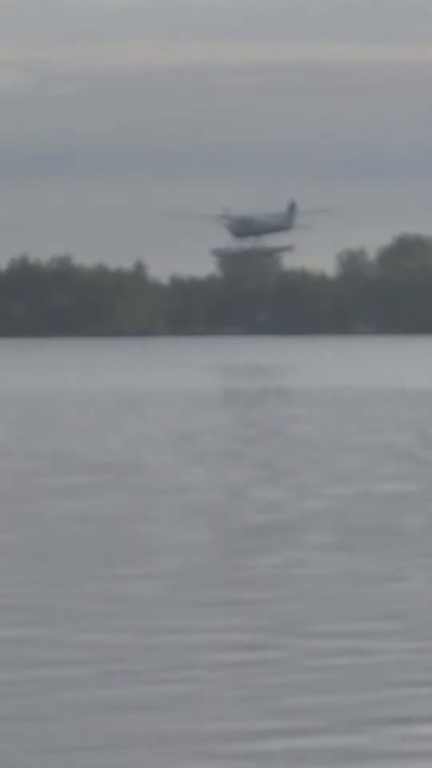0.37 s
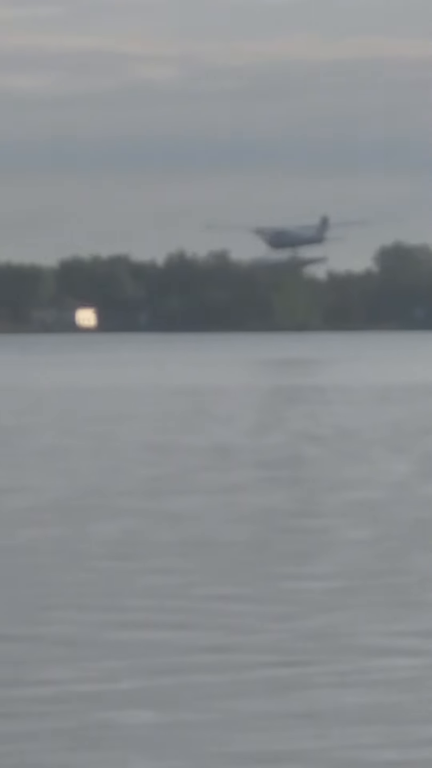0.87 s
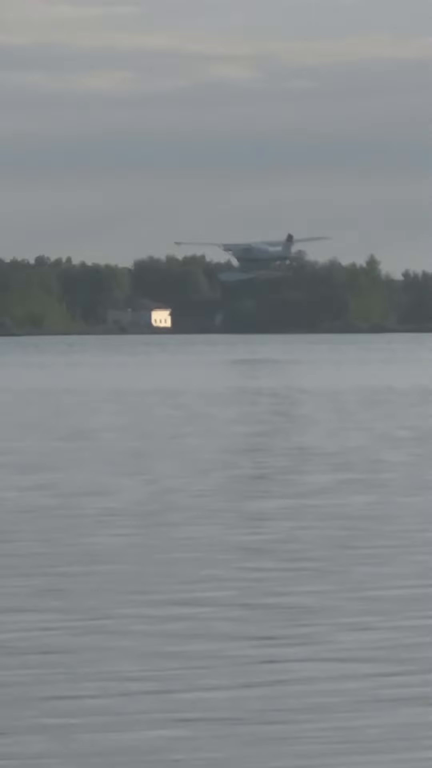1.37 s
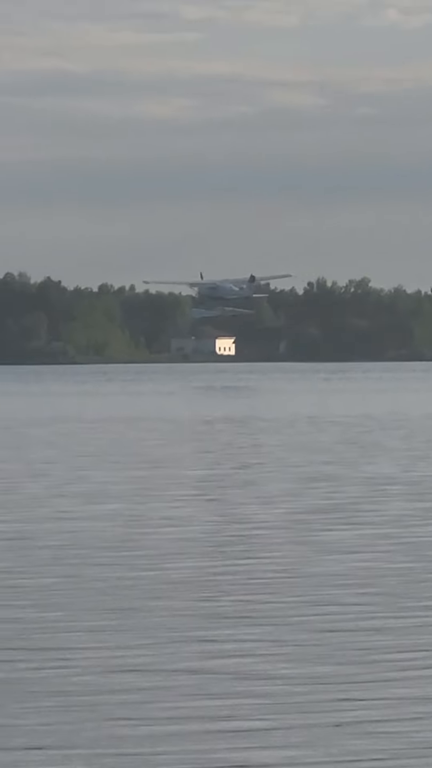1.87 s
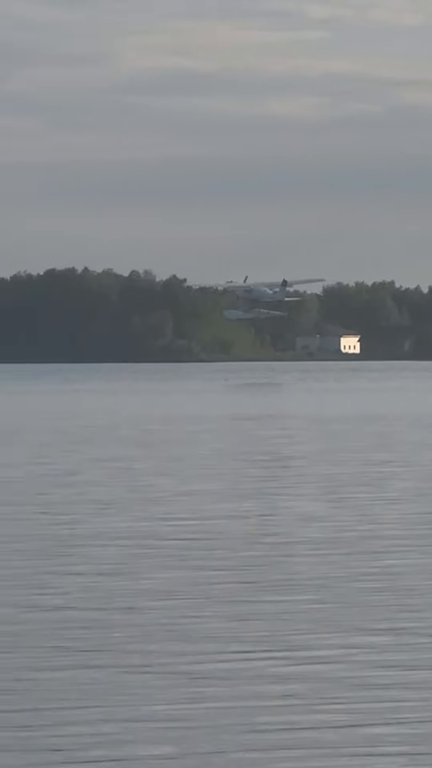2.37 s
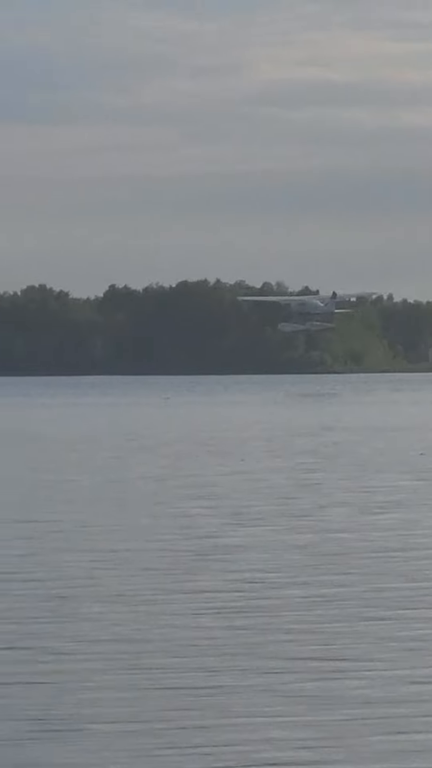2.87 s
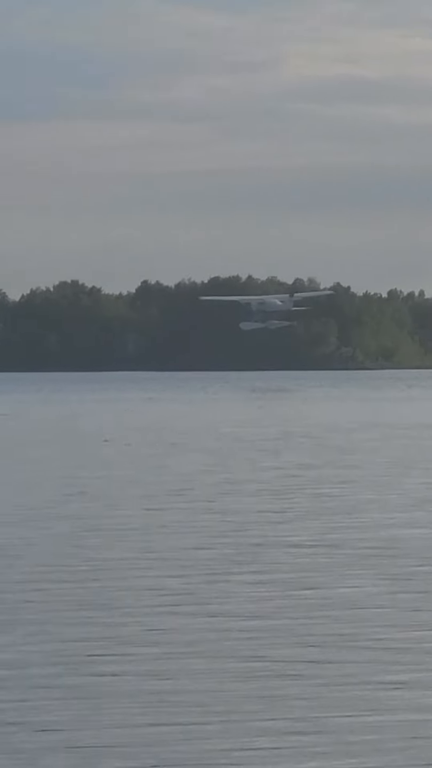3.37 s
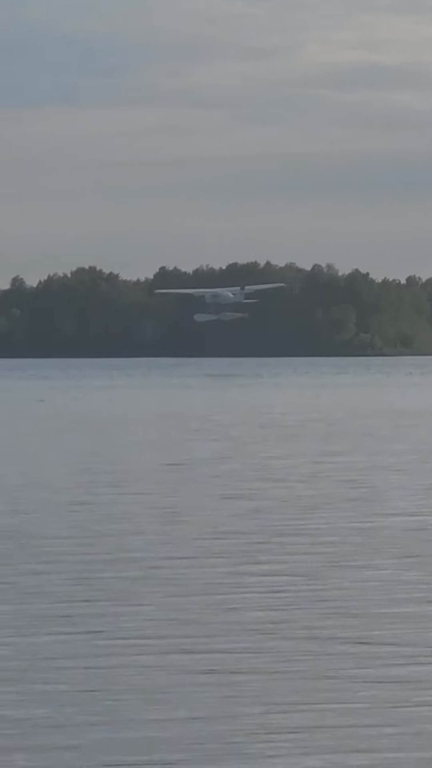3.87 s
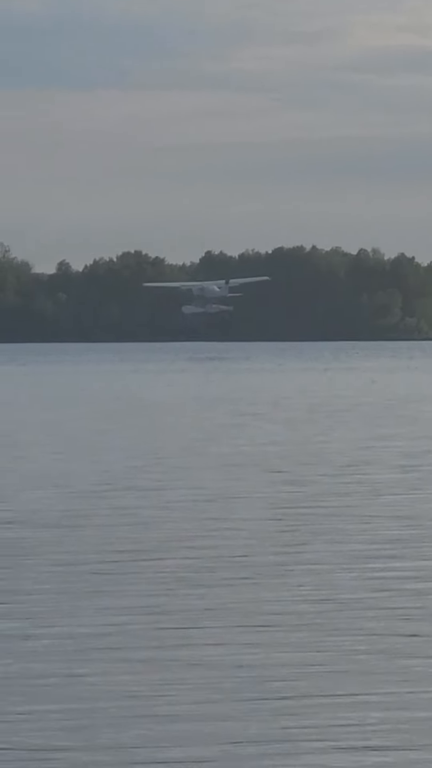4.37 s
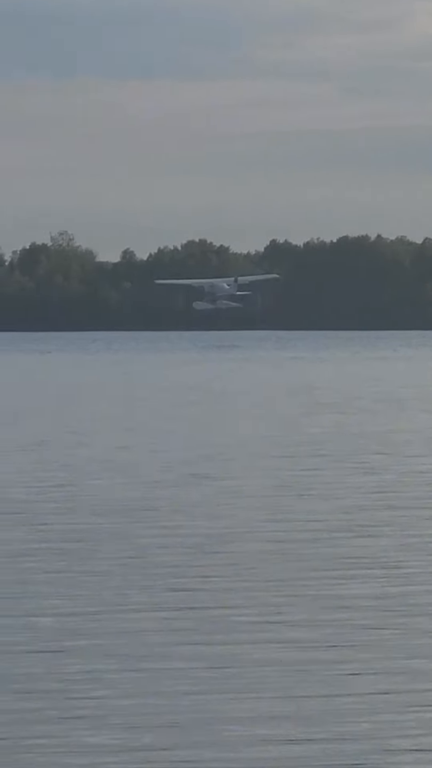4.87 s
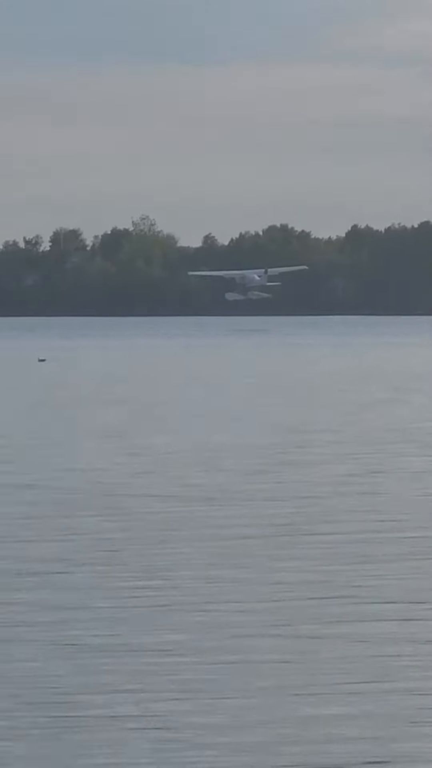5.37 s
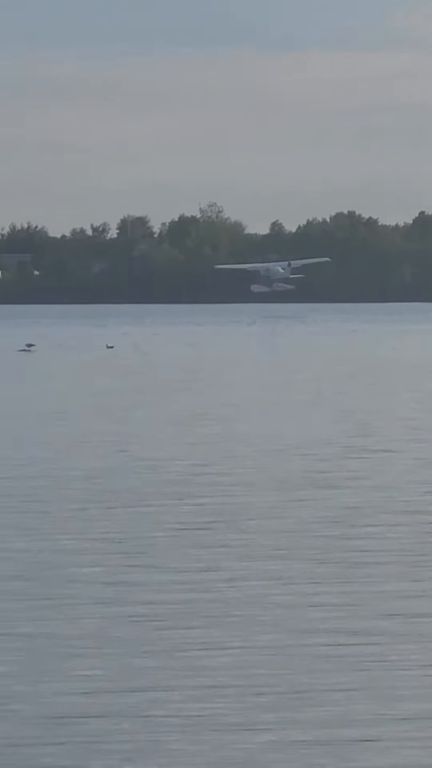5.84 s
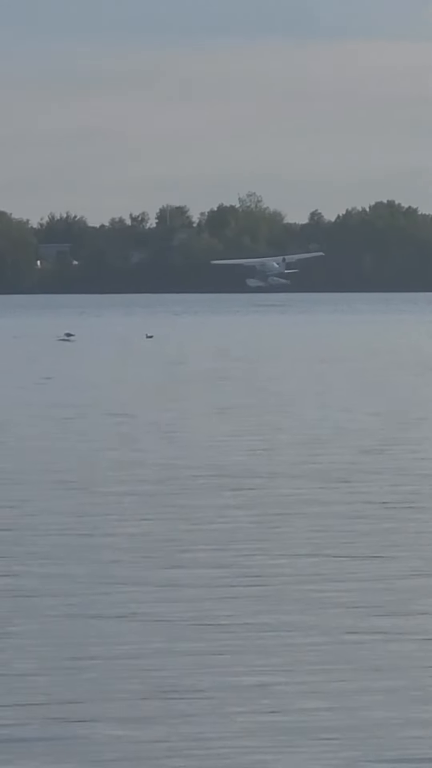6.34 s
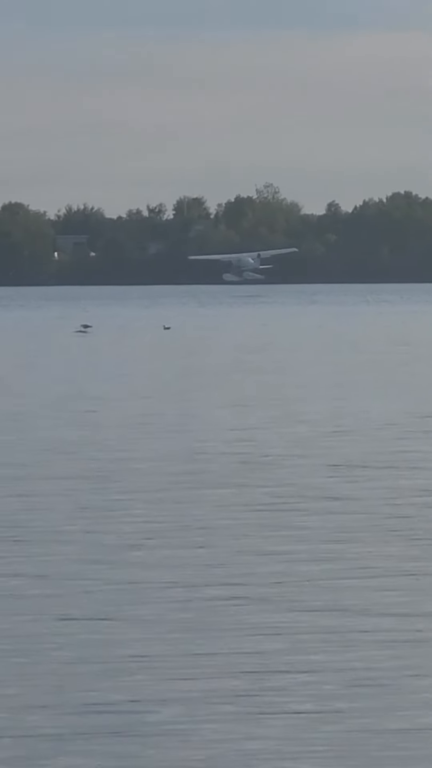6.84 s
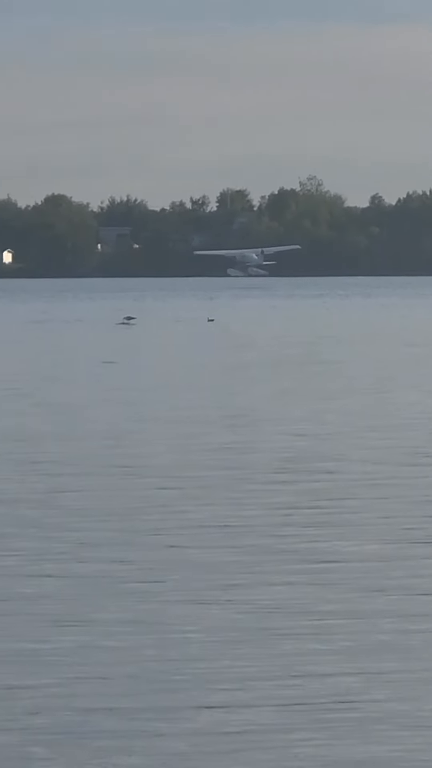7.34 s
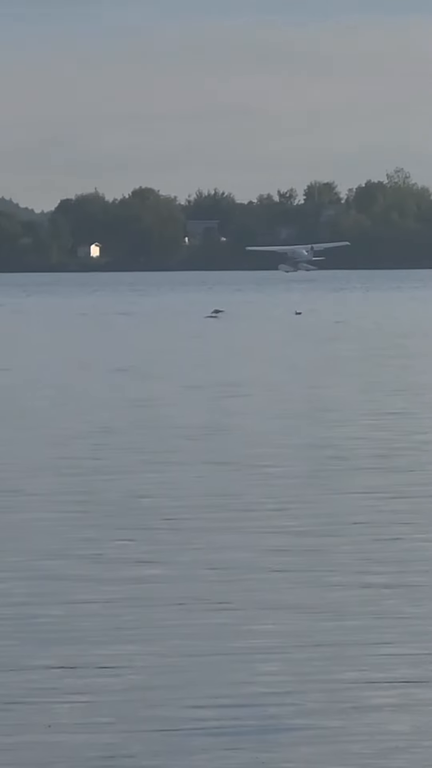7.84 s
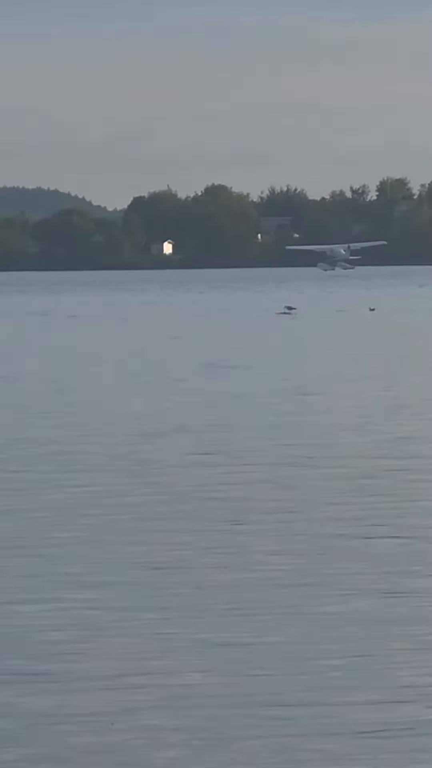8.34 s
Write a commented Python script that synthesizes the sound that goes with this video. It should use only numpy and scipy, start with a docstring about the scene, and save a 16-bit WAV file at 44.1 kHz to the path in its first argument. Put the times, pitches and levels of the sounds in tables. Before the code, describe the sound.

Outdoors by a lake, a small propeller plane glides away at low throttle with soft flutters of blade noise, swells with power around two to three seconds, eases back near four, then revs again and holds a higher, more distant drone. A steadier low motor hum lies beneath. Songbirds warble throughout with woodland echoes; one buzzes at three seconds. Handheld stereo pickup with a few tiny ticks.

```python
"""A small floatplane glides down over a lake, its pilot twice adding power: tones locked to one shaft, exhaust
and airframe noise and puffs of blade slap, all following throttle and distance. A steady motor hums farther
off, a drone and its octave in a fading rumble. On the shore songbirds warble in gliding tones, a blackbird
buzzes in pulses that ring its throat, a bird chips and a larger one whistles, all with echoes. Shore noise lies
beneath; small clicks sound right at the microphone."""
import sys
import numpy as np
from scipy import signal
from scipy.fft import rfft, irfft
from scipy.io import wavfile
from scipy.ndimage import uniform_filter1d

SR = 44100
rng = np.random.default_rng(int(sys.argv[2]) if len(sys.argv) > 2 else 0)


def pcm_store(signal):
    """Save signal as 16-bit PCM."""
    levels = np.round(np.clip(np.atleast_2d(signal), -1, 1) * 32767)
    wavfile.write(sys.argv[1], SR, levels.astype(np.int16).T)


def amplitude_ratio(level_db):
    """Convert a level in decibels to the matching linear amplitude (field) ratio."""
    exponent = np.asarray(level_db, float) / 20
    return 10 ** exponent


N = 384552
T = np.arange(N) / SR
# Samples by which sound reaches the left port after the right one; negative: the left port leads.
LAKE_LAG, SHORE_LAG = -7, -2


def level(x, db):
    """Scale to an rms level."""
    return x * amplitude_ratio(db) / np.sqrt(np.mean(x ** 2))


def curves(rows):
    """Columns of a table as sample-rate curves."""
    s, *columns = np.transpose(rows)
    return [np.interp(T, s, c) for c in columns]


def walk(rate):
    """Random levels held 1 / rate s and slewed twice; spread near 1."""
    hold = int(SR / rate)
    steps = np.repeat(rng.standard_normal(N // hold + 1), hold)
    return 1.3 * uniform_filter1d(uniform_filter1d(steps, hold), hold)[:N]


def ports(x, pan_db, lag):
    """One direction: a level step and a lag in samples between the two microphone ports."""
    return np.array([np.roll(x, lag) * amplitude_ratio(pan_db / 2), x * amplitude_ratio(-pan_db / 2)])


def bin_hz():
    """Pitches of the spectrum bins, kept above zero for the logarithm."""
    return np.maximum(np.arange(N // 2 + 1) * SR / N, 1)


def across(rows):
    """A table's second column over the spectrum, straight lines on log pitch."""
    hz, value = np.transpose(rows)
    return np.interp(np.log(bin_hz()), np.log(hz), value)


# How alike wide noise is at the two ports. Each row: pitch in Hz, likeness from 0 to 1.
LIKENESS = [(30, 0.78), (120, 1), (290, 0.95), (640, 0.98), (1400, 0.7), (3000, 0.1), (8000, 0)]


def noise(colour, humps=()):
    """Stereo noise of a colour with resonances; alike in the bass, unrelated in the treble."""
    hz = bin_hz()
    db = across(colour) + sum(g / (1 + (2 * (hz - f) / w) ** 2) for f, w, g in humps)
    like = np.clip(across(LIKENESS), 0, 1)
    same, left, right = rfft(rng.standard_normal((3, N)))
    late = np.exp(-2j * np.pi * hz * LAKE_LAG / SR)
    shared = np.sqrt(like) * same * np.array([late, np.ones_like(late)])
    apart = np.sqrt(1 - like) * np.array([left, right])
    return level(irfft((shared + apart) * amplitude_ratio(db), N), 0)


def band(x, hz, width):
    """Steep band-pass."""
    edges = [hz - width / 2, hz + width / 2]
    return signal.sosfilt(signal.butter(2, edges, "bandpass", fs=SR, output="sos"), x)


def sing(notes, overtones_db, flutter_db, wobble):
    """Near-sine glides with rounded corners, soft edges, a fluttering level and a wobbling pitch."""
    out, flutter, bend = np.zeros(N), amplitude_ratio(flutter_db * walk(120)), 1 + wobble * walk(150)
    for note in notes:
        s, hz, db = np.transpose(note)
        i = np.arange(int(s[0] * SR), min(int(s[-1] * SR), N))
        corner = min(len(i) // 5 + 1, 500)  # samples
        hz, db = (uniform_filter1d(np.interp(i / SR, s, c), corner) for c in (hz, db))
        phase = 2 * np.pi * np.cumsum(hz * bend[i]) / SR
        edge = np.clip(np.minimum(i - i[0], i[-1] - i) / (.003 * SR), 0, 1)
        tone = np.sin(phase)
        for k, overtone_db in enumerate(overtones_db):
            tone = tone + amplitude_ratio(overtone_db) * np.sin((k + 2) * phase)
        out[i] += np.sqrt(2) * amplitude_ratio(db) * edge * flutter[i] * tone
    return out


def trees(x, t60, wet_db):
    """Scattered echoes off trunks and water, other ones at each port; leaves and air dull them."""
    t = T[:SR]
    tail = rng.standard_normal((2, len(t))) * 1000 ** (-t / t60) * np.clip(t / .008, 0, 1)
    tail /= np.sqrt(np.sum(tail ** 2, axis=1, keepdims=True))
    tail = signal.sosfilt(signal.butter(2, 5200, fs=SR, output="sos"), tail)
    return amplitude_ratio(wet_db) * signal.fftconvolve(x[None], tail, axes=1)[:, :N]


# Colour of the noise along the shore. Each row: pitch in Hz, relative density in dB per Hz.
SHORE = [(1300, -15.5), (2200, -1.5), (3600, -4), (5200, -5), (6900, -7.5), (7800, -11), (8300, -32.5),
         (8800, -38), (9800, -36), (10400, -37), (14500, -23.5), (15700, -39), (16100, -82)]


def shore_noise():
    """A steady, faint wide noise around the microphone."""
    return amplitude_ratio(-65) * noise(SHORE)


# Hum of the distant motor. Each row: time in seconds, pitch in Hz, mean level in dB.
HUM = [(0, 117.9, -54), (.5, 117.6, -44), (1.2, 117, -38.5), (1.8, 115, -45), (2.4, 113.6, -40),
       (2.9, 109.5, -40), (3.55, 109.5, -39.5), (4.1, 114, -42), (5.2, 116.3, -37.5), (5.8, 119.2, -41),
       (6.5, 115.1, -41), (7.5, 112.5, -42.5), (8.72, 114.4, -42.5)]
# Colour of the low rumble. Each row: pitch in Hz, relative density in dB per Hz.
RUMBLE = [(15, -50), (28, -22), (45, -5), (65, 0), (95, -3), (140, -7), (200, -10), (300, -20), (600, -60)]


def motor():
    """A steady drone with a weak octave, and the fading rumble around it."""
    octave_db, rumble_db, fade_db_per_s = -19, -42, 0.45
    hz, db = curves(HUM)
    phase = 2 * np.pi * np.cumsum(hz) / SR + .3 * walk(6.6)
    octave = amplitude_ratio(octave_db + 2.5 * walk(5)) * np.sin(2 * phase)
    tone = amplitude_ratio(db + 1.34 * walk(8)) * (np.sin(phase) + octave)
    rumble = amplitude_ratio(rumble_db - fade_db_per_s * T) * noise(RUMBLE)
    return ports(np.sqrt(2) * tone, 0.08, LAKE_LAG) + rumble


# Tiny clicks right at the microphone. # Each row: time in seconds, relative level in dB, ring in Hz, left minus
# right in dB.
TICKS = [(.670, -44, 6900, -11), (5.5358, -34, 14300, 1.5), (5.570, -50, 13600, 5.5),
         (5.5776, -34, 5560, -10.5), (5.577, -42.5, 13840, -2), (5.6035, -40, 4740, -5.5),
         (5.748, -59, 8850, -2), (7.824, -43, 7050, -9.5)]


def ticks():
    """Tiny clicks that ring for a millisecond."""
    out, t = np.zeros((2, N)), T[:300]
    for s, db, hz, pan_db in TICKS:
        ring = np.sin(2 * np.pi * hz * t) * np.e * t / 0.00026 * np.exp(-t / 0.00019)
        click = ring + .1 * rng.standard_normal(len(t)) * np.exp(-t / .0002)
        i = int(s * SR)
        out[:, i:i + len(t)] += amplitude_ratio(db + np.array([[pan_db], [-pan_db]]) / 2) * click
    return out


# Low whistles on the shore, a list of notes.
# Each row of a note: time in seconds, pitch in Hz, direct level in dB before the flutter.
WHISTLE = [
    [(2.45, 1177, -65), (2.468, 1195, -58), (2.518, 1201, -53), (2.58, 1172, -50), (2.598, 1155, -63),
     (2.61, 1305, -63)],
    [(8.34, 831.5, -62), (8.356, 752, -62), (8.43, 1580, -51.5), (8.456, 1686, -40.5), (8.476, 1370, -59),
     (8.5, 1350, -55)],
    [(8.555, 1188, -64.5), (8.575, 1274, -45.5), (8.595, 1390, -47), (8.621, 1413, -42), (8.669, 1353, -53),
     (8.72, 1400, -47.5)],
]


def large_bird():
    """Low gliding whistles, nearly pure; the last note carries two faint overtones."""
    return sing(WHISTLE[:2], [], 0.6, 0.0022) + sing(WHISTLE[2:], [-26, -28], .8, .002)


# Chip of a near bird. Each row: time in seconds, pitch in Hz, relative level in dB.
CHIP = [(3.934, 8230, -56), (3.939, 7270, -44), (3.946, 6800, -40.5), (3.951, 5700, -58),
        (3.962, 3300, -64)]


def near_chip():
    """One very short tone that plunges in pitch."""
    return sing([CHIP], [], 1.1, 0.0093)


# Songbird slides along the shore.
# Each row: start in seconds, length in seconds, first pitch in Hz, last pitch in Hz, relative level in dB.
SLIDES = [ (.245, 0.041, 3270, 2580, -57), (.39, 0.055, 4880, 3780, -55.5), (.5, 0.024, 4400, 5460, -50),
          (.64, 0.037, 2610, 3620, -56), (1.19, .035, 2800, 3540, -55), (1.61, 0.052, 2750, 4830, -54),
          (1.66, 0.024, 3400, 2620, -68), (2.005, 0.032, 4400, 3020, -57), (2.05, .055, 3150, 4900, -52.5),
          (2.185, 0.046, 4850, 3200, -51), (2.375, 0.046, 2600, 4300, -53), (2.47, .04, 3900, 2700, -59),
          (3.085, 0.027, 5700, 5760, -56), (3.11, .05, 4700, 3450, -58), (3.19, .03, 3150, 3450, -50),
          (3.33, 0.02, 3150, 3420, -50), (3.42, 0.028, 2980, 3470, -49.5), (3.5, .02, 2990, 3400, -52),
          (3.67, .04, 2990, 3560, -63), (2.1, .035, 4750, 4900, -57.5), (2.3, .03, 3600, 3620, -61),
          (3.8, 0.086, 2840, 2900, -59.5), (4.165, 0.032, 4090, 5040, -54),
          (4.198, .042, 4100, 2520, -54.5), (4.23, 0.051, 4250, 4750, -55), (4.25, 0.017, 2950, 2960, -56),
          (4.94, 0.027, 5100, 5750, -55), (4.95, 0.038, 4750, 4700, -60.5), (4.98, .02, 4700, 5300, -54),
          (5.01, 0.029, 4500, 5260, -52.5), (5.035, 0.036, 3900, 4930, -54), (5.15, .06, 3900, 3060, -59.5),
          (5.34, .05, 4270, 2735, -56.5), (5.46, .02, 3690, 2830, -56), (5.5, 0.053, 2600, 4700, -54),
          (5.56, 0.063, 4500, 2580, -53.5), (5.96, 0.036, 3200, 3000, -64.5), (6.0, 0.035, 3030, 4160, -58),
          (6.03, .045, 4090, 4310, -57.5), (6.05, 0.025, 4100, 5150, -59), (5.07, .04, 2600, 2730, -63),
          (5.18, 0.059, 2450, 2350, -60), (6.07, 0.12, 4200, 2480, -53), (6.21, .035, 2750, 3750, -53.5),
          (6.205, 0.09, 2680, 2860, -63), (6.665, .03, 4200, 5260, -55), (6.7, .055, 4900, 3780, -50),
          (6.76, 0.037, 5150, 4540, -54), (6.82, 0.1, 2450, 2910, -60), (6.845, 0.049, 3700, 2640, -53),
          (6.91, .1, 3000, 2900, -58), (6.965, 0.026, 2980, 3680, -53), (7.07, .055, 2940, 2300, -62.5),
          (7.143, .02, 2900, 3700, -53), (7.175, 0.032, 4950, 2530, -58), (7.2, 0.082, 2300, 2600, -57.5),
          (7.85, .03, 3890, 2930, -65), (7.88, .02, 2930, 4300, -51.5), (7.955, .065, 3650, 2410, -58.5),
          (8.04, .03, 2520, 3010, -54), (8.095, .025, 3200, 3500, -55), (8.118, .012, 3500, 4100, -59),
          (7.95, .025, 3200, 2600, -58), (8.405, 0.014, 3300, 2700, -51)]
# Songbird arches, up and down again or the reverse.
# Each row: start in seconds, length in seconds, end pitch in Hz, turning pitch in Hz, relative level in dB.
ARCHES = [ (.085, 0.07, 2960, 4520, -50), (.3, 0.039, 3020, 3360, -53.5), (.69, 0.05, 2470, 2850, -59),
          (1.495, .075, 2680, 3510, -58), (2.31, 0.052, 2630, 3500, -51.5), (2.512, 0.058, 2590, 3710, -57),
          (4.335, .078, 2650, 3760, -52.5), (4.435, .055, 2870, 3310, -57), (4.515, 0.054, 3300, 4210, -55),
          (5.065, 0.056, 3420, 4440, -52.5), (5.24, 0.093, 2300, 3630, -53),
          (5.7, 0.075, 2204, 3250, -57.5), (6.92, 0.072, 5780, 3816, -55.5),
          (7.92, 0.058, 3060, 3660, -54.5)]
# Songbird loudness by pitch. Each row: pitch in Hz, gain in dB.
THROAT = [(2200, -4.5), (2900, -0.2), (3800, -2.5), (4800, -7), (5800, -5.5)]


def warble():
    """Slides and arches as notes: each swells in its middle and is louder where the throat favours it."""
    swell_db = 1.5  # note ends under its middle
    u = np.linspace(0, 1, num=9)
    fall = 1 - (1 - u) ** 1.35  # falling slides drop fast, then level off
    arch = np.sin(np.pi * u) ** 1.6
    notes = []

    def add(s, length, hz, db):
        note_db = db + np.interp(hz, *np.transpose(THROAT)) - swell_db * (2 * u - 1) ** 2
        notes.append(np.c_[s + length * u, hz, note_db])

    for s, length, first, last, db in SLIDES:
        add(s, length, first + (last - first) * (u if last > first else fall), db)
    for s, length, end, turning, db in ARCHES:
        add(s, length, end + (turning - end) * arch, db)
    return sing(notes, [], 3.24, .014)


# The blackbird's clear opening notes, a list of notes.
# Each row of a note: time in seconds, pitch in Hz, relative level in dB.
OPENING = [
    [(3.025, 2334, -52), (3.045, 2550, -46.5), (3.095, 2610, -55.5)],
    [(3.1, 2600, -66), (3.15, 2520, -61.5), (3.185, 2650, -50)],
]
# Its buzz. Each row: start in seconds, hold in seconds from the start, relative level in dB.
BUZZES = [(3.178, 0.38, -52)]
# Throat bands that the buzz rings. Each row: centre in Hz, width in Hz, relative level in dB.
BUZZ_BANDS = [(2756, 270, 6.5), (3200, 1280, 4.5), (4700, 570, 1.5), (5240, 130, -5)]


def blackbird():
    """Clear notes, then a rough trill: fast uneven pulses ring a few throat bands."""
    attack_s, fade_db_per_s, pulse_hz = .006, 102, 158
    shape = np.zeros(N)
    for s, hold, db in BUZZES:
        fade_db = fade_db_per_s * np.maximum(T - s - hold, 0)
        shape += np.clip((T - s) / attack_s, 0, 1) * amplitude_ratio(db - fade_db)
    cycle = np.cumsum(pulse_hz * (1 + .04 * walk(60))) / SR % 1
    pulses = (np.diff(cycle, prepend=0) < 0) * amplitude_ratio(3 * rng.standard_normal(N))
    drive = level(pulses, 0) + rng.standard_normal(N)  # breath as strong as the pulses
    throat = sum(level(band(drive, f, w), db) for f, w, db in BUZZ_BANDS)
    tremor = 1 + 0.13 * np.sin(2 * np.pi * 36 * T)
    return level(throat, 0) * tremor * shape + sing(OPENING, [], 1.3, 0.0032)


def shore_birds():
    """All birds, direct and echoed: near reeds and trunks answer at once, the far wood rings on."""
    small, chip, large = warble() + blackbird(), near_chip(), large_bird()
    direct = amplitude_ratio(-2) * ports(small + chip, 0.3, SHORE_LAG) + ports(large, 0.0, SHORE_LAG)
    near = trees(small + amplitude_ratio(1.5) * chip, 0.17, -3.5)
    far = trees(small + amplitude_ratio(-5.5) * chip, 1.2, -3.5)
    return direct + near + far + trees(large, 0.95, -7.0)


# Shaft of the plane. Each row: time in seconds, turns per second in Hz.
SHAFT = [(0, 17.8), (1.65, 17.4), (1.85, 18.2), (2.23, 20.8), (2.5, 22.4), (2.75, 23.5), (2.95, 23.8),
         (3.3, 23.2), (4, 20.8), (4.4, 20), (4.75, 19.6), (5, 19.9), (5.35, 21.5), (5.76, 24.1), (6, 25.5),
         (6.3, 25.8), (7.3, 26.1), (8.72, 26.6)]
# Flight over the lake. Each row: time in seconds, throttle from 0 to 1, distance from the phone in metres.
FLIGHT = [(0, 0.17, 85), (.6, 0, 123), (1.35, 0.07, 102), (1.75, 0.36, 180), (1.9, 0.58, 178),
          (2.15, 0.8, 226), (2.8, 0.96, 320), (3.05, .72, 320), (3.6, 0.42, 337), (4, 0.2, 454),
          (4.5, 0.11, 380), (4.7, 0.56, 450), (5, 0.59, 500), (5.35, 0.91, 480), (6, .97, 460),
          (7, 0.88, 470), (8.72, 0.76, 484)]
# Shaft tones. Each row: multiple of the shaft rate, idle level in dB at the reference distance and shaft
# rate, gain in dB at full throttle, slope in dB per octave of shaft rate, share of the distance loss.
TONES = [(3., -50, 21, 0.4, 0.015), (2., -52, -0.5, 29, 0.0083), (4., -45, -13, -11, 0.1),
         (6., -44, 13, -3.7, 1.29), (9., -52.5, 2.5, 8, 0.41)]
# Exhaust, airframe and blade slap, in that order. Each row: idle level in dB at the reference distance,
# gain in dB at full throttle, share of the distance loss.
ROARS = [(-44.5, 2.5, 1.007), (-48, 6, 1.22), (-60.5, 8.5, 1.68)]
# Brief swells of the slap, and weaker ones of the roar.
# Each row: centre in seconds, time to fall to 1/e in seconds, size in dB for the slap.
SLAP_SWELLS = [(0.8, .07, 6.5), (1, 0.051, 11), (0.41, 0.048, 0)]
# Resonances in all the plane's noise. Each row: centre in Hz, width in Hz, height in dB.
HUMPS = [(626, 130, 8.5), (1464, 300, 8.5), (2094, 390, 8.5), (6620, 100, 10)]
# Colours of the three noises. Each row: pitch in Hz, relative density in dB per Hz.
EXHAUST = [(80, -47.5), (150, -21.5), (250, -2.5), (400, -8.5), (620, -7), (1000, -9.5), (1400, -26.5),
           (2500, -76.5)]
AIRFRAME = [(400, -61), (800, -14), (1100, -2), (1500, -2), (2240, -9), (2500, -11), (4000, -17),
            (5200, -58.5), (7000, -91.5)]
SLAP_COLOUR = [(1200, -59.5), (2500, -8.5), (3800, -5), (5000, 1.5), (7000, -9.5), (7900, -20), (8400, -60)]


def plane():
    """Six cylinders and two blades on one shaft; moving air makes every tone waver on its own."""
    near_m, idle_shaft_hz = 100, 20  # reference for the levels
    shaft, (throttle, metres) = curves(SHAFT)[0], curves(FLIGHT)
    loss_db, octaves = 20 * np.log10(metres / near_m), np.log2(shaft / idle_shaft_hz)
    turn = 2 * np.pi * np.cumsum(shaft) / SR
    tones = np.zeros(N)
    for waver_db, (k, db, gain, tilt, share) in zip((.8, 1.5, 3, 1.5, 1.5), TONES):
        tone_db = db + gain * throttle + tilt * octaves - share * loss_db + waver_db * walk(9)
        tones += amplitude_ratio(tone_db) * np.sin(round(k) * turn + 0.18 * waver_db * walk(8.9))
    exhaust_db, airframe_db, slap_db = (db + gain * throttle - share * loss_db for db, gain, share in ROARS)
    swell_db = sum(db * np.exp(-((T - s) / w) ** 2) for s, w, db in SLAP_SWELLS)
    gusts = amplitude_ratio(.7 * np.array([walk(6), walk(6)]) + .3 * swell_db)
    # three firings and two blade passes a turn
    firing, blade = np.sin(3 * turn), np.sin(2 * turn)
    exhaust = amplitude_ratio(exhaust_db) * gusts[0] * noise(EXHAUST, HUMPS) * (1 + 0.2 * firing)
    airframe = amplitude_ratio(airframe_db) * gusts[1] * noise(AIRFRAME, HUMPS) * (1 + 0.21 * blade)
    # each blade pass gives a puff of treble that decays until the next
    puff = np.exp(-(turn / np.pi % 1) / 0.95) * amplitude_ratio(1.6 * walk(25) + swell_db)
    slap = level(puff * noise(SLAP_COLOUR, HUMPS), 0) * amplitude_ratio(slap_db)
    return ports(np.sqrt(2) * tones, 0.091, LAKE_LAG) + exhaust + airframe + slap


def scene():
    """All sources at the two ports."""
    return shore_noise() + motor() + ticks() + shore_birds() + plane()


def top_cut(x):
    """Nothing passes above the cut-off."""
    return signal.sosfilt(signal.butter(12, 16520, fs=SR, output="sos"), x)


# Colour of the phone's two microphone ports. Each row: pitch in Hz, left minus right in dB.
PORTS = [(30, 1.5), (110, .9), (250, -.2), (600, 1.5), (1300, -3.3), (2400, -1.3), (4400, 1.2), (8100, -1),
         (15000, -.3)]


def record(dry):
    """The two microphone ports differ a little in colour."""
    tilt_db = across(PORTS)
    mix = irfft(rfft(dry) * amplitude_ratio(np.array([tilt_db, -tilt_db]) / 2), N)
    return top_cut(mix)


dry = scene()
out = record(dry)
pcm_store(out)
```